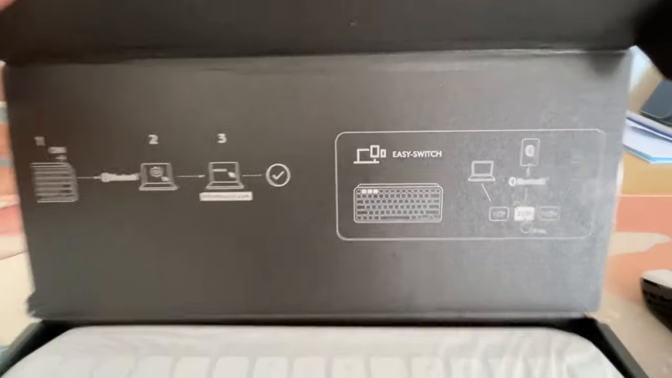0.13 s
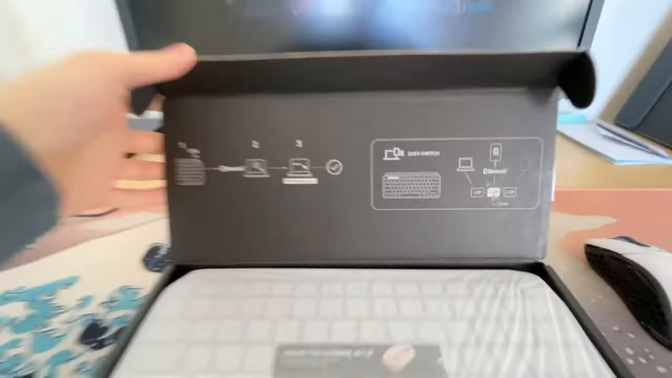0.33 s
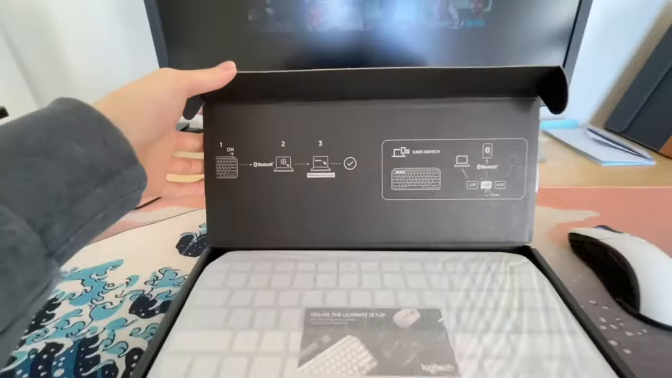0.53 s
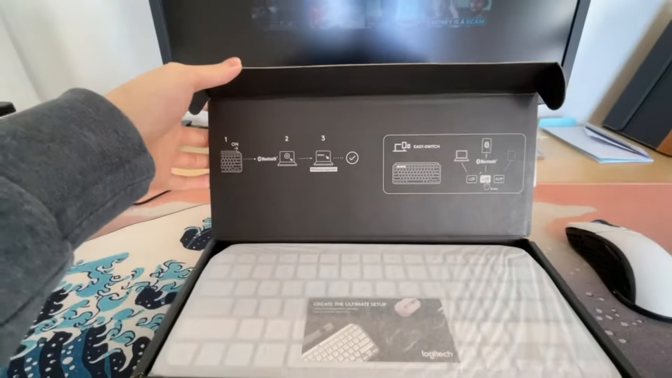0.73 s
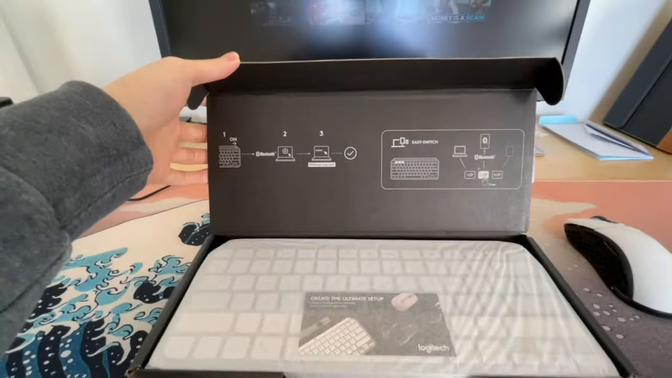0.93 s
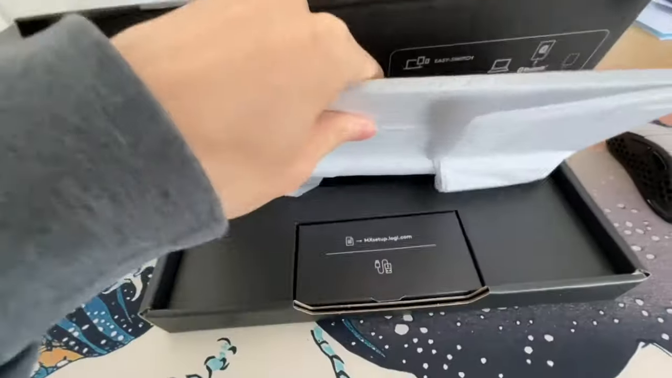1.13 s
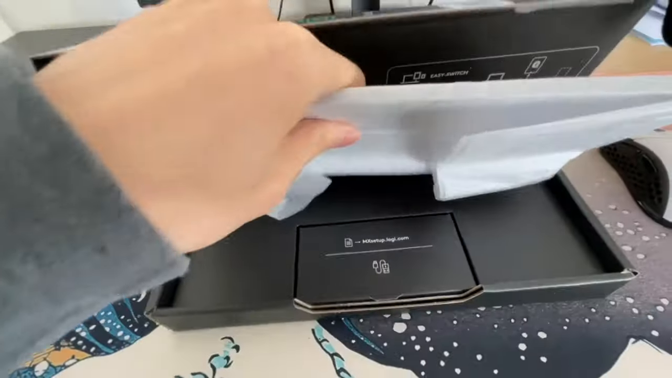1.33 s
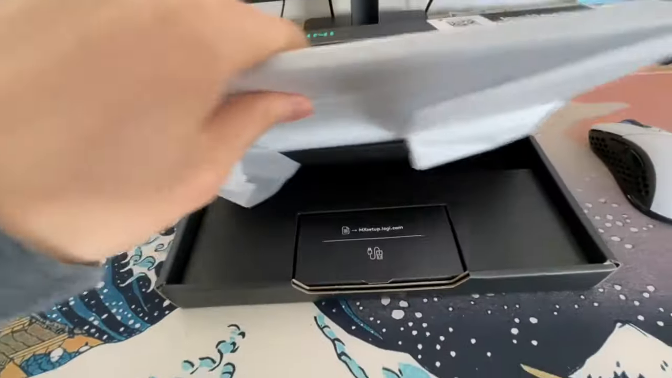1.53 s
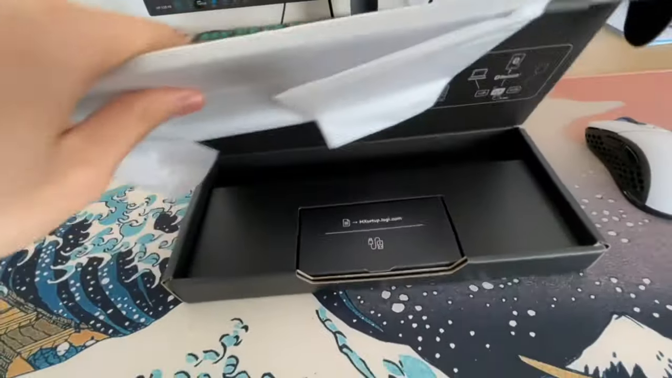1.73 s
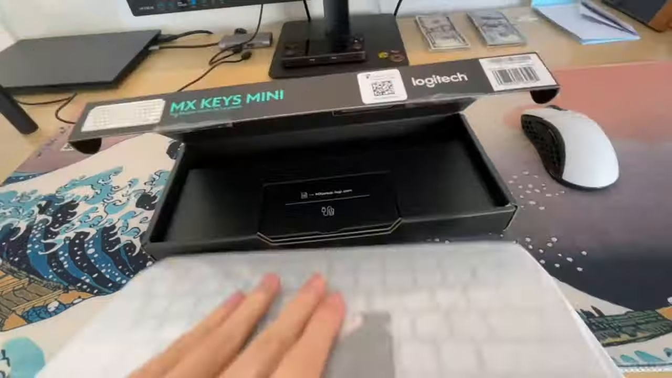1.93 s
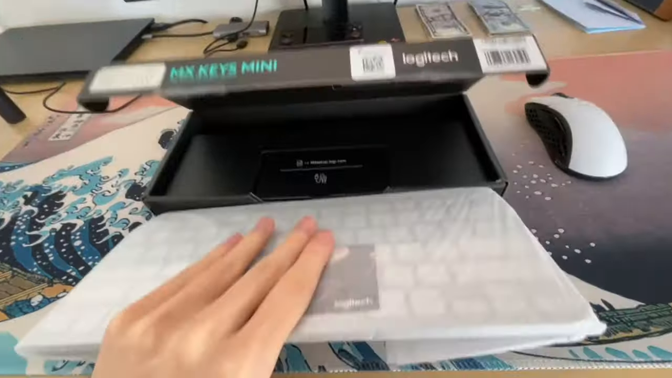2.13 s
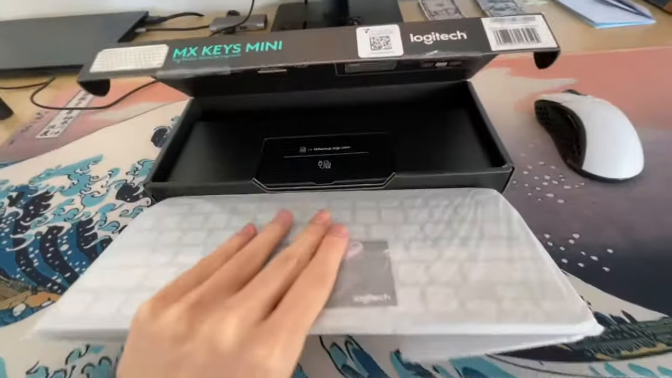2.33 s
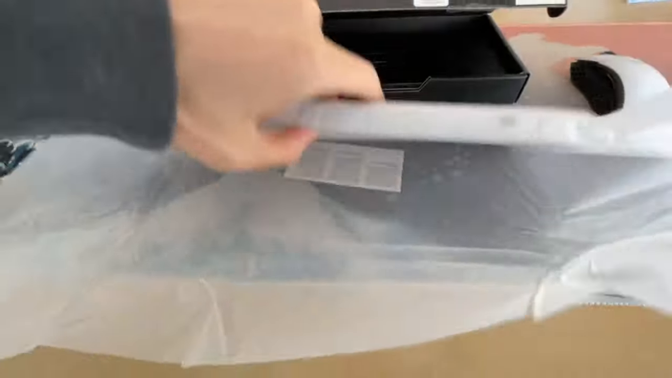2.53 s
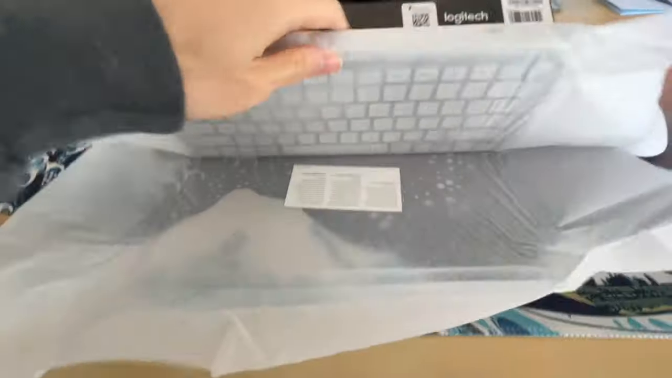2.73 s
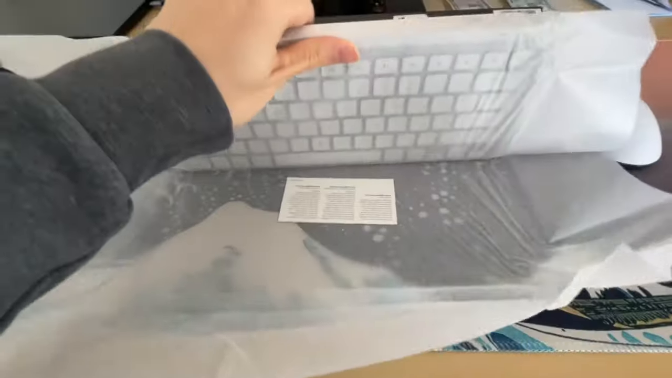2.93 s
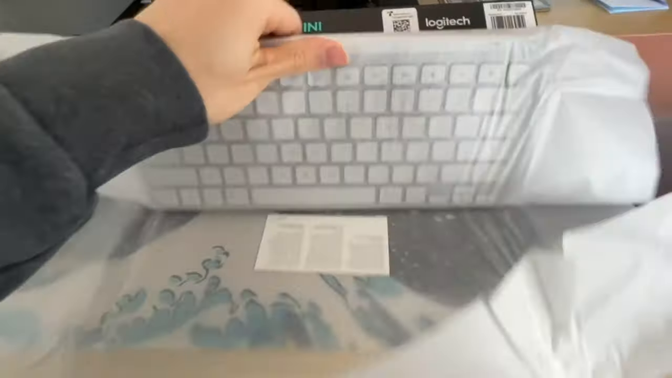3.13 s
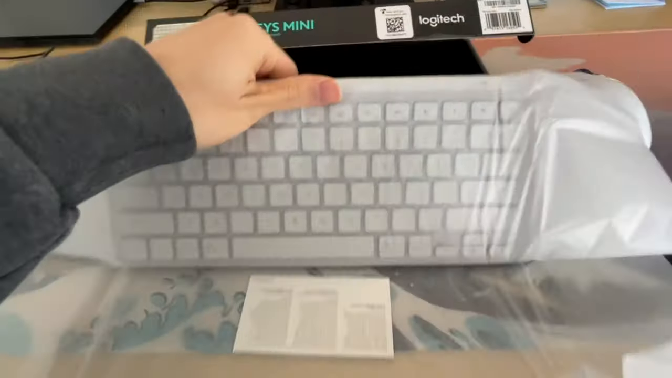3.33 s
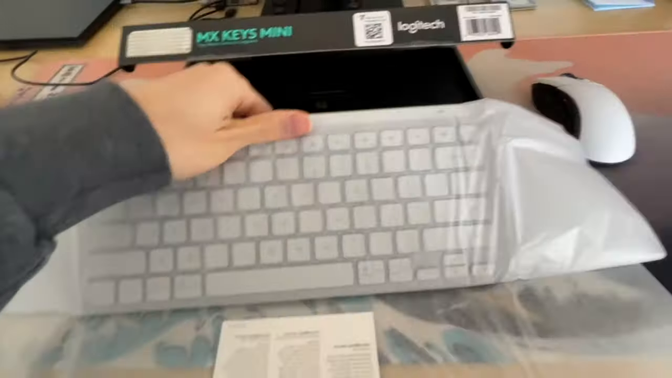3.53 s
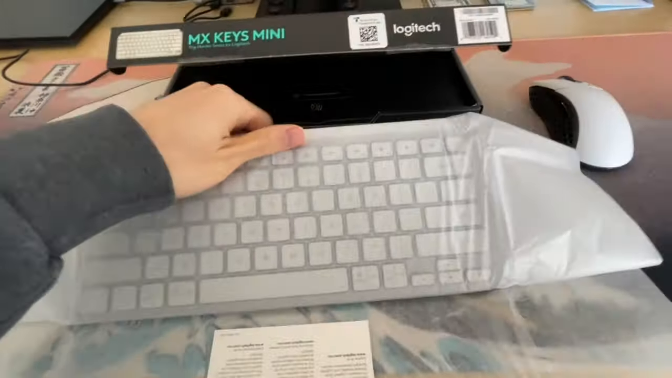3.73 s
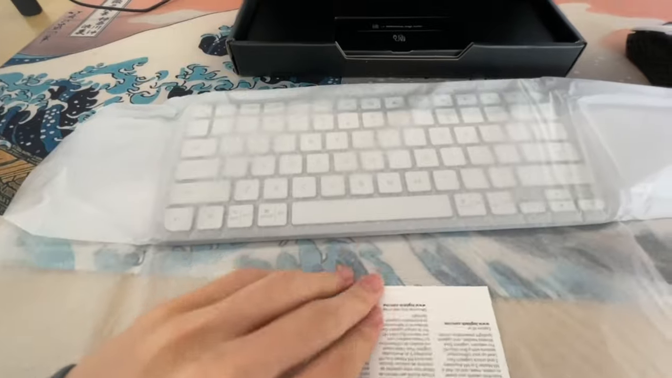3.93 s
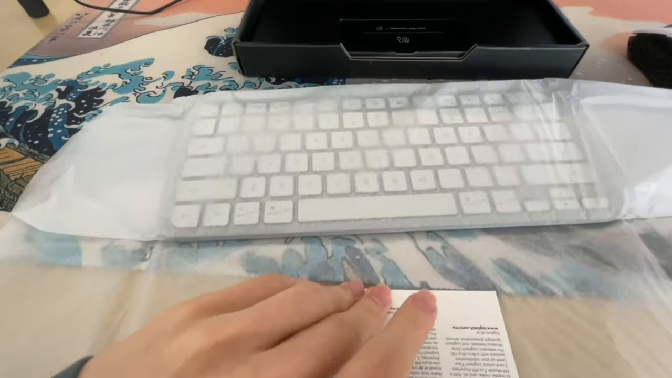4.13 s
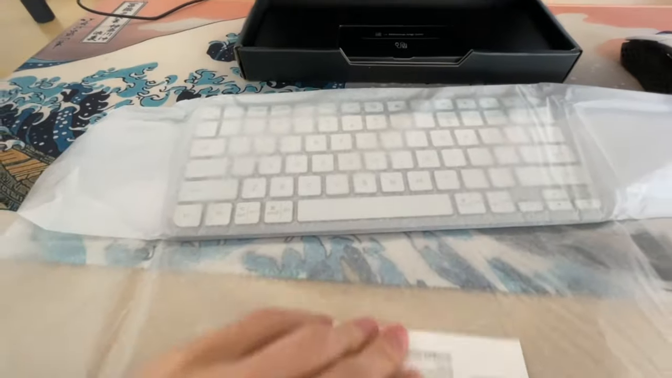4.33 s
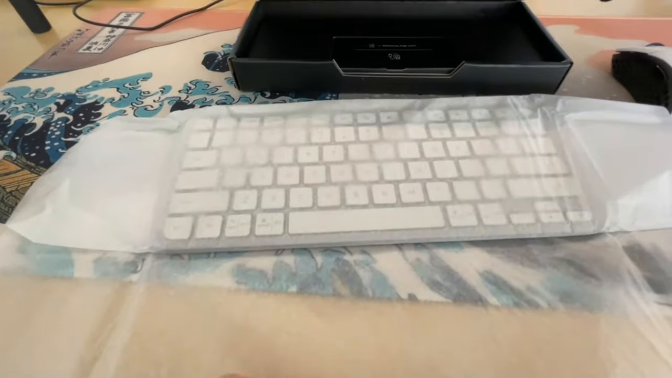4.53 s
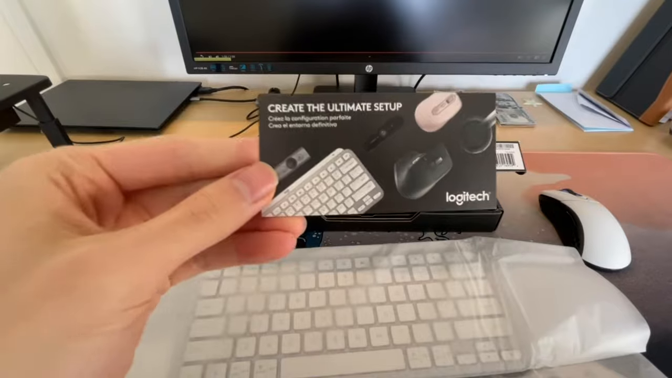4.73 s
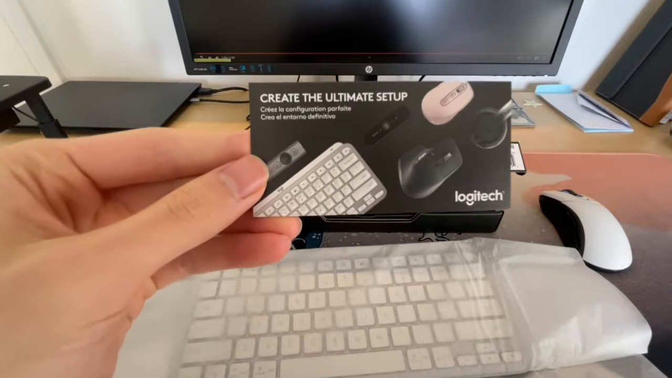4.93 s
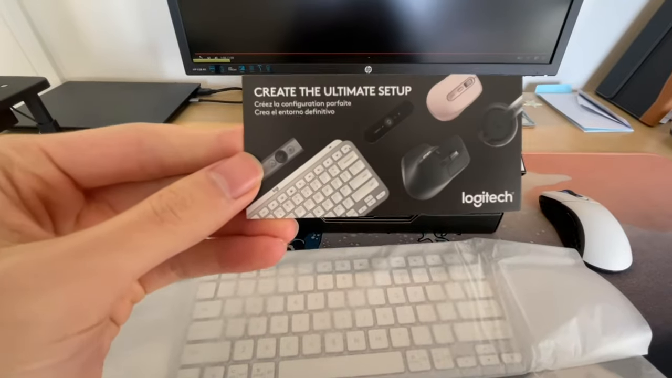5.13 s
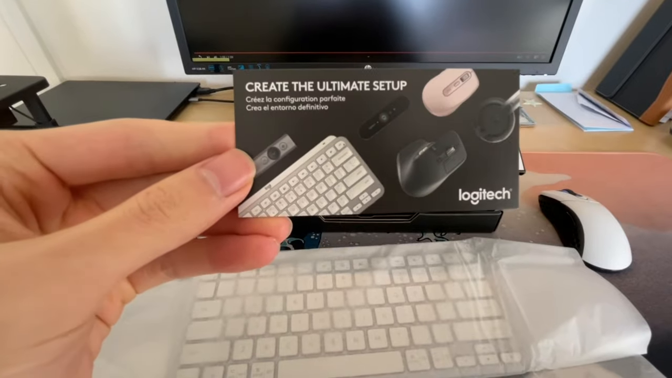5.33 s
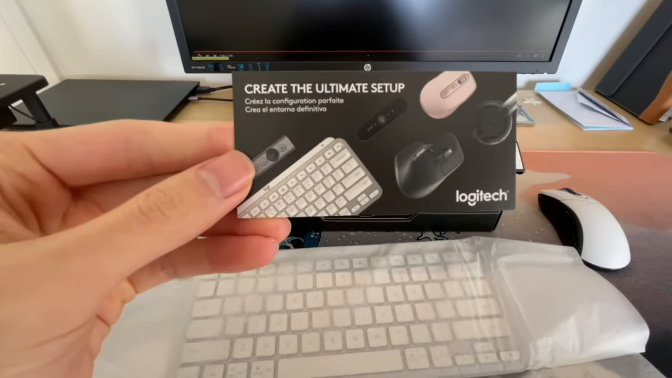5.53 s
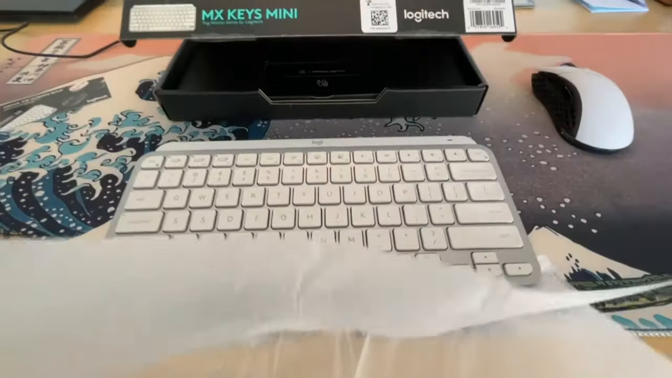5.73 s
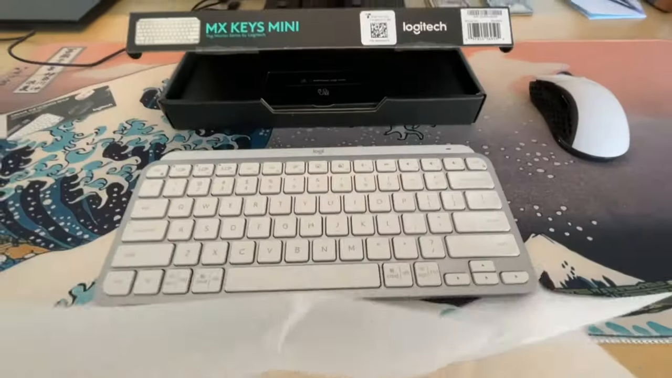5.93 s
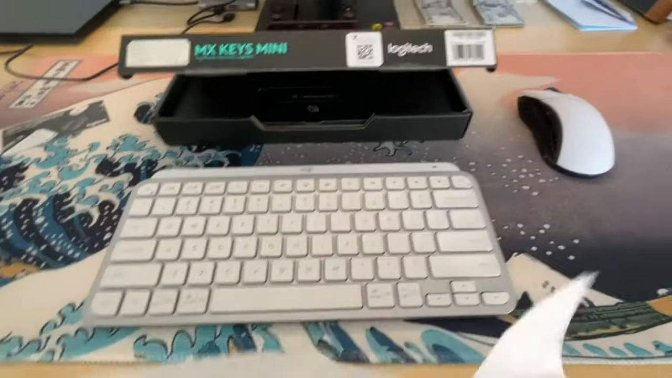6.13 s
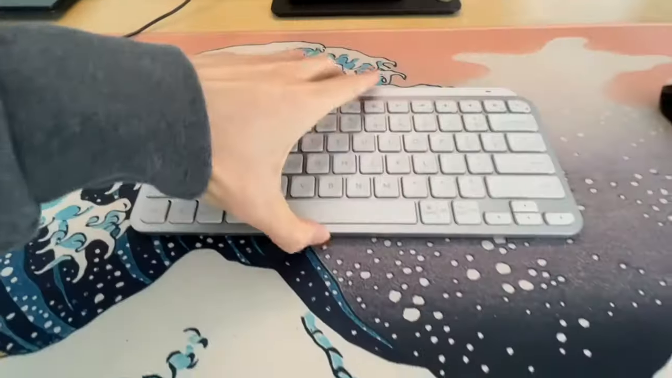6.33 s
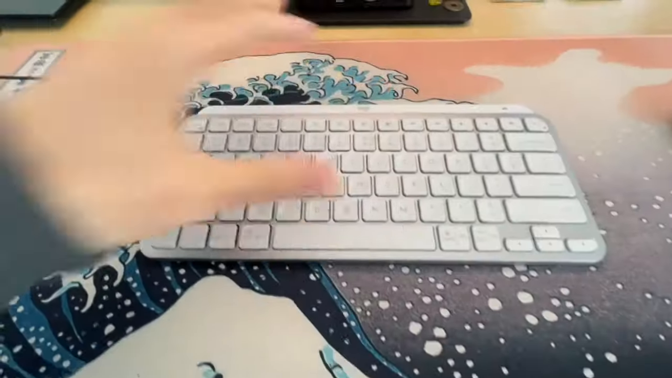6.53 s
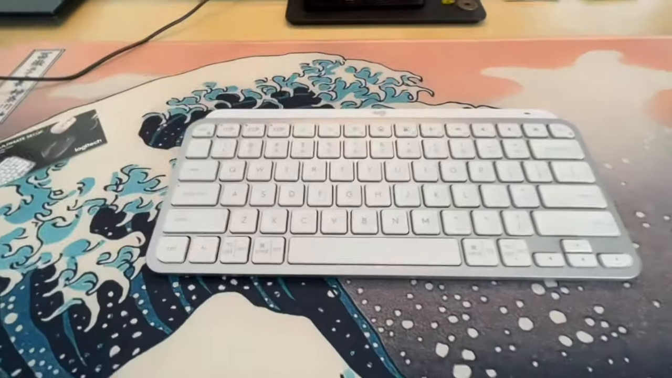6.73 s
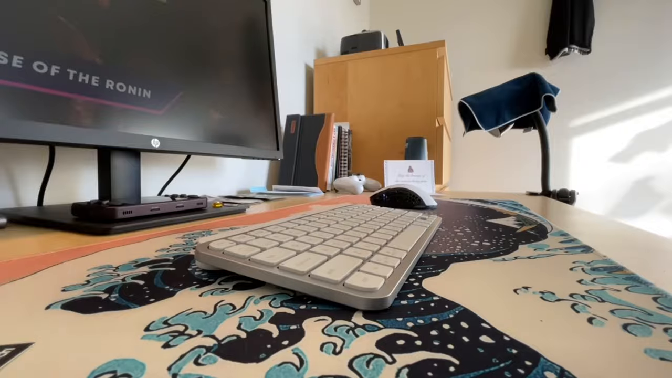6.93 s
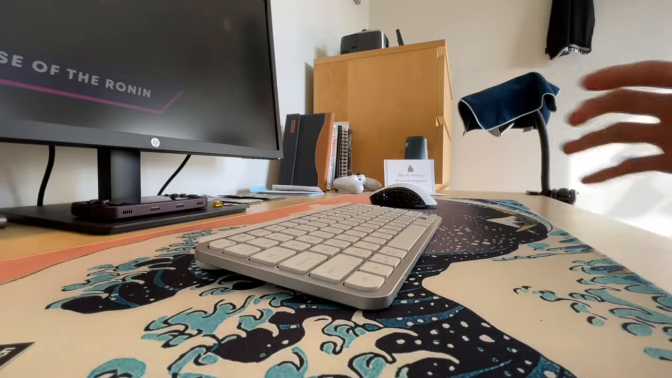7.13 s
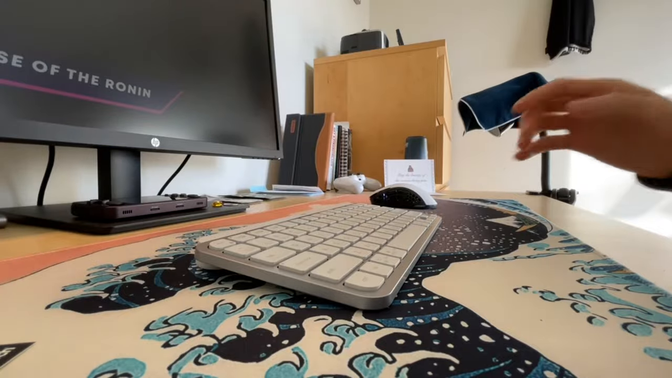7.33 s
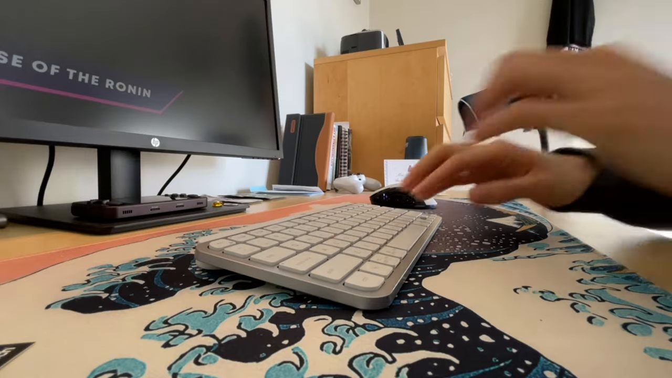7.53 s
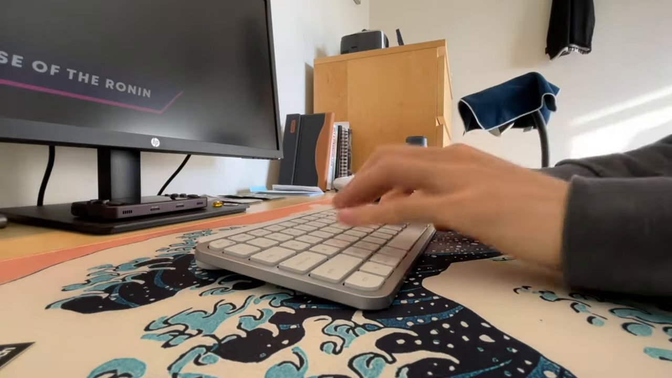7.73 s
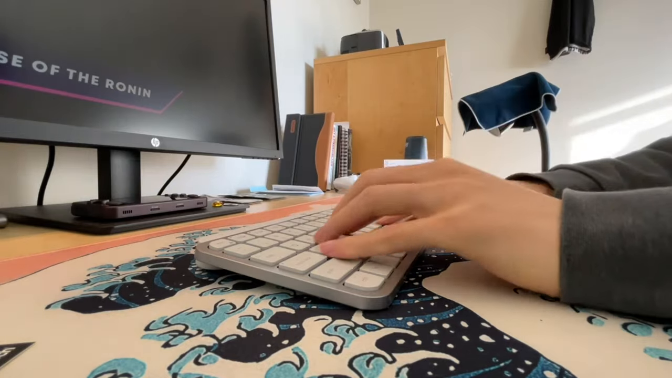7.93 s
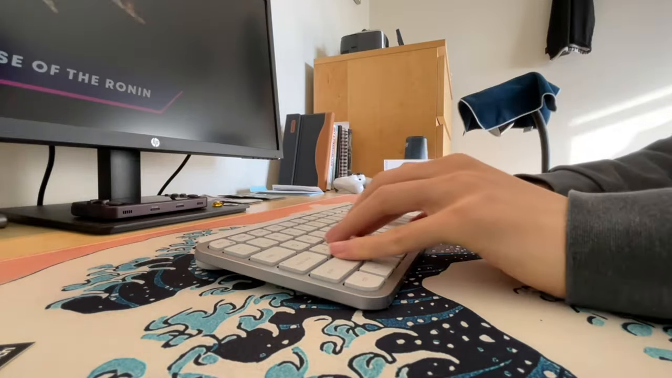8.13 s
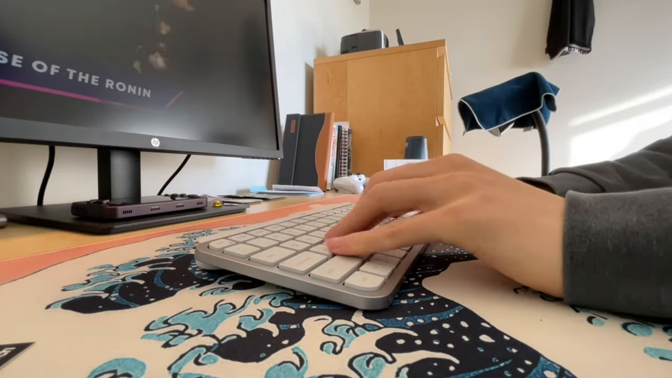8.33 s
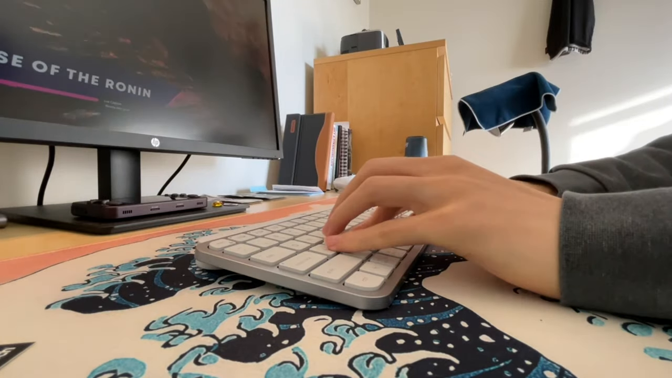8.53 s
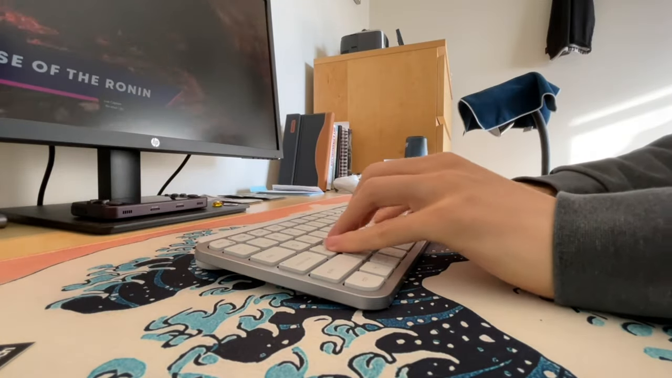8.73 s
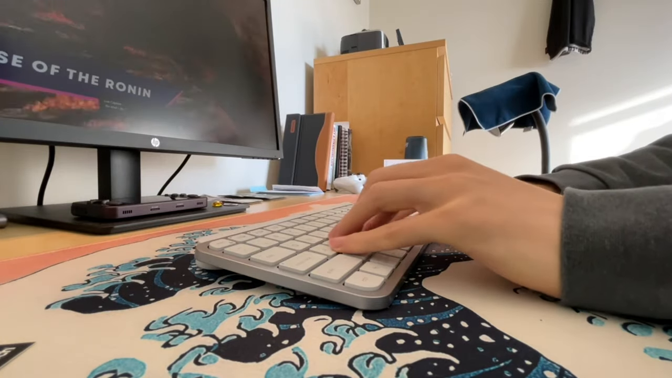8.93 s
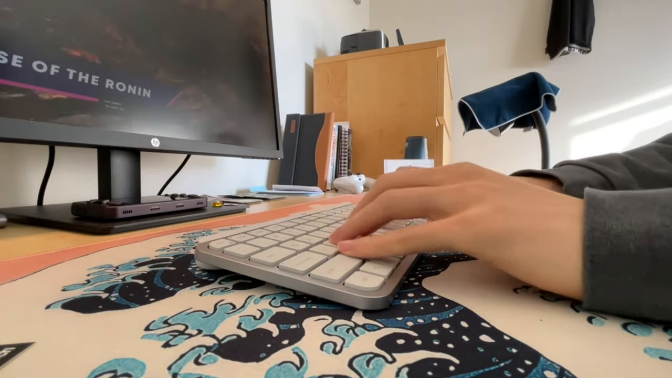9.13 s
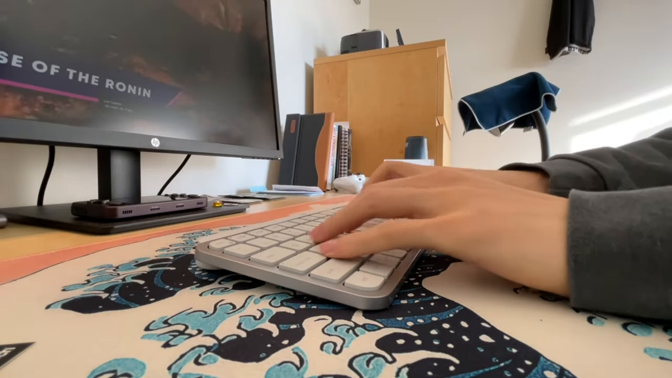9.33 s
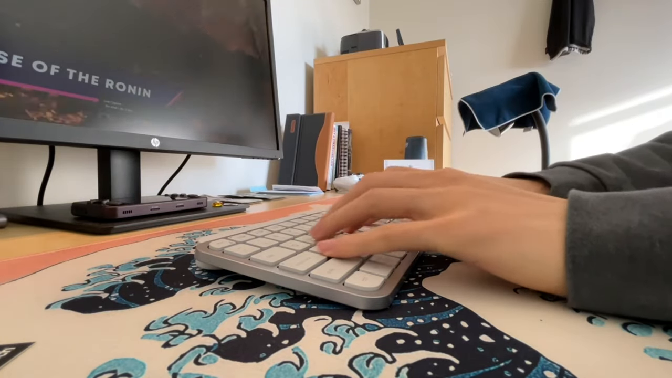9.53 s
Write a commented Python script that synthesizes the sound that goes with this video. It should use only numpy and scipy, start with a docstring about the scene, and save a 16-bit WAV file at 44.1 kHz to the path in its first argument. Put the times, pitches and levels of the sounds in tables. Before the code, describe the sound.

A keyboard is unpacked in a small quiet room: hollow cardboard bumps, loud crackling thin wrapper, hard clacks, then soft quick typing over computer fan hum.

```python
"""At a desk in a small quiet room, hands brush a lid, then a slim keyboard is unpacked from its box.
Its thin paper wrapper hisses, crackles and snaps; its edge rubs and rasps on cardboard (noise through
moving resonances) and bumps make the hollow box boom (decaying modes). The frame clacks on the desk.
Then cuffs sweep the mat, a computer fan comes up (shaped noise and wavering tones), and typing begins:
light key ticks (noise bursts with a small ring) over soft thuds of the desk top (low modes)."""
import sys
import numpy as np
from scipy import signal
from scipy.fft import rfft, irfft, next_fast_len
from scipy.io import wavfile

SR = 44100
rng = np.random.default_rng(int(sys.argv[2]) if len(sys.argv) > 2 else 0)


def transcribe(signal):
    """Save signal, clipped to [-1, 1], as a 16-bit WAV file at the path in sys.argv[1]."""
    frames = np.atleast_2d(signal).T
    limited = np.clip(frames, -1, 1)
    pcm = np.round(limited * 32767).astype(np.int16)
    wavfile.write(sys.argv[1], SR, pcm)


N = 422919
TIME = np.arange(N) / SR

# modes of the desk top under the mat: f/Hz before detuning, relative level/dB, t60/s
DESK_MODES = [(58.1, -3.5, 0.2), (73.7, -6, 0.2), (106, -5.5, 0.17), (120.8, -6, 0.24), (136, -11, 0.12),
              (175, -14, 0.11), (276.6, -26.5, 0.07)]
# spectrum of a paper fold snapping: f/Hz, relative level/dB
SNAP_SPECTRUM = [(400, -10), (1500, -14), (3500, -7), (7000, -1.5), (10000, 4), (12500, -1.5), (15500, -20)]


def from_db(db):
    """Decibels to gain."""
    return 10 ** (np.asarray(db) / 20)


def rms_one(x):
    """Scale to unit rms."""
    return x / np.sqrt(np.mean(x ** 2) + 1e-20)


def in_time(rows):
    """Each column of a curve at every sample."""
    s, *columns = np.transpose(rows)
    return [np.interp(TIME, s, c) for c in columns]


def during(start, end, fade_s):
    """One from start to end, fading in just before and out just after."""
    inside_s = np.minimum(TIME - start, end - TIME)
    return np.clip(1 + inside_s / fade_s, 0, 1)


def pan(side_db):
    """Left and right gains of constant power; positive leans left."""
    gains = from_db(np.array([[.5], [-.5]]) * side_db)
    return gains / np.sqrt(np.mean(gains ** 2, axis=0))


def from_left(x):
    """Sound from the left reaches the right side a moment later."""
    lag_s = 0.00042
    return np.array([x[0], np.interp(TIME - lag_s, TIME, x[1])])


def drift(per_s):
    """Smooth random wandering with unit rms, given new targets per second."""
    knots = rng.standard_normal(int(N / SR * per_s) + 2)
    return rms_one(np.interp(TIME * per_s, np.arange(len(knots)), knots))


def colour(x, spectrum):
    """Shape a sound by a spectrum that falls 24 dB per octave beyond its ends; unit rms."""
    hz, db = np.transpose(spectrum)
    size = next_fast_len(x.shape[-1])
    f = np.arange(size // 2 + 1) * SR / size + 1e-3
    octaves_outside = np.maximum(np.log2(hz[0] / f), 0) + np.maximum(np.log2(f / hz[-1]), 0)
    gain = from_db(np.interp(np.log(f), np.log(hz), db) - 24 * octaves_outside)
    return rms_one(irfft(rfft(x, size) * gain, size)[..., :x.shape[-1]])


def stereo_noise(alike, size=N):
    """White noise, partly shared by both sides."""
    alike = np.clip(alike, 0, 1)
    shared = np.sqrt(alike) * rng.standard_normal(size)
    return shared + np.sqrt(1 - alike) * rng.standard_normal((2, size))


def add(out, s, sound):
    """Mix a short sound in at a time."""
    start = min(round(s * SR), N)
    out[:, start:start + sound.shape[-1]] += sound[..., :N - start]


def crack(spectrum, t60, tail_db, tail_t60, alike, rise_s=1e-5):
    """A contact rings many dense modes: a fast noise burst and a faint tail; peak 1 in the mono mix."""
    t = TIME[:SR // 4]
    decay = from_db(-60 * t / t60) + from_db(tail_db - 60 * t / tail_t60)
    envelope = decay * (1 - np.exp(-t / rise_s))
    burst = colour(stereo_noise(alike, size=len(t)), spectrum) * envelope
    return burst / np.abs(burst.mean(axis=0)).max()


def struck(modes, contact_s, scatter_db, detune, in_step=False):
    """A body rings with new mode strengths at each hit; modes in step knock harder; peak 1."""
    t = TIME[:SR // 3]
    hz, db, t60 = np.transpose(modes)[:, :, None]
    strength, shift = rng.standard_normal((2, len(modes), 1))
    signs = 1 if in_step else (-1) ** np.arange(len(modes))[:, None]
    decay = from_db(db + scatter_db * strength - 60 * t / t60)
    rings = signs * decay * np.sin(2 * np.pi * hz * (1 + detune * shift) * t)
    sound = rings.sum(axis=0) * (1 - np.exp(-t / contact_s))
    return sound / np.abs(sound).max()


def firmer(modes, firm_db):
    """A firm contact lifts the higher modes, a soft one quiets them: dB per octave above the lowest."""
    lowest_hz = modes[0][0]
    return [(hz, level + firm_db * np.log2(hz / lowest_hz), *rest) for hz, level, *rest in modes]


def room(x, wet_db):
    """Diffuse reflections of a small furnished room, different on each side."""
    t, t60 = TIME[:SR // 2], 0.43
    tail = rng.standard_normal((2, len(t))) * from_db(-60 * t / t60) * (t > .004)
    tail /= np.sqrt(np.sum(tail ** 2, axis=1, keepdims=True))
    return x + from_db(wet_db) * signal.fftconvolve(x, tail, axes=1)[:, :N]


def swells(rows):
    """Gain of hand movements that speed up to a rounded peak and slow down; their powers sum."""
    swell_db, curve = 18.5, 1.61  # gained over the rise and lost over the fall
    t, power = TIME[::32], 0
    for s, rise_s, fall_s, db in rows:
        away = np.maximum((s - t) / rise_s, (t - s) / fall_s)
        power = power + from_db(db - swell_db * np.minimum(np.abs(away), 10) ** curve) ** 2
    return np.interp(TIME, t, np.sqrt(power))


def crackle(per_s, spread_db, clump_db):
    """Tiny buckles come in clumps, each with its own size, direction and short quiver."""
    born = rng.random(N) < per_s * from_db(clump_db * drift(60)) / SR
    sizes = born * from_db(spread_db * np.minimum(rng.exponential(1, N), 3))
    clicks = rms_one(sizes * np.tanh(stereo_noise(alike=0.074)))
    quiver_t60 = .003
    pole = from_db(-60 / (quiver_t60 * SR)) ** 2  # squared, as it acts on power
    dying_power = signal.lfilter([1], [1, -pole], sizes ** 2 + 1e-18)
    quiver = rms_one(np.sqrt(dying_power) * rng.standard_normal((2, N)))
    return rms_one(clicks + quiver)


def gliding(slips, hz, width_hz):
    """A resonance whose centre moves, excited by slips: shift to zero, low-pass, shift back."""
    turn = np.exp(2j * np.pi * np.cumsum(hz) / SR)
    lowpass = signal.butter(2, width_hz / 2, fs=SR, output="sos")
    return np.real(turn * signal.sosfilt(lowpass, slips / turn))


def tone(hz, db):
    """A fan tone, slightly wavering in pitch and level."""
    phase = 2 * np.pi * np.cumsum(hz * (1 + 0.0024 * drift(25))) / SR
    return np.sqrt(2) * from_db(db + 1.3 * drift(7.8)) * np.sin(phase)


def background():
    """Quiet room air as shaped noise, and a computer fan of broad air noise, blade tone and faint tones."""
    # spectra of the room air (the computer faintly in it) and of the fan's air: f/Hz, relative level/dB
    room_spectrum = [(25, -14), (50, -0.5), (75, -6.5), (130, -17.5), (200, -16), (340, -18.5),
                     (500, -16.5), (730, -16), (840, -8.5), (1100, -23.5), (1700, -26.5), (2400, -24),
                     (3500, -37.5), (9700, -48.5), (14000, -61)]
    fan_spectrum = [(250, -14), (330, -13), (385, -14), (465, -5.5), (535, -14.5), (620, -3.5), (740, -8.5),
                    (900, -10), (1230, -17), (1750, -25.5), (2100, -21), (2700, -29.5), (5000, -34.5),
                    (6500, -44), (8000, -41.5), (9400, -35.5), (10400, -41), (11500, -50.5), (14000, -58)]
    # level of the fan's air, and of its blade tone: t/s, level/dB
    fan_curve = [(0, -72.5), (6.3, -93), (6.4, -70.5), (6.85, -60.5), (7.0, -60.5), (7.5, -56.5),
                 (8.2, -55), (9.59, -55)]
    hum_curve = [(6.88, -100), (6.95, -70.5), (7.2, -63), (9.59, -60)]
    # faint steady tones of the computer: f/Hz, level/dB
    whines = [(140, -82.5), (339, -83), (473.7, -80.5), (560, -84.5), (705, -75.5), (840, -75)]
    fan_db, = in_time(fan_curve)
    hum_db, = in_time(hum_curve)
    air = from_db(-62.0) * colour(stereo_noise(alike=0.36), room_spectrum)
    fan = from_db(fan_db) * colour(stereo_noise(alike=0.52), fan_spectrum)
    blades = tone(340.3, hum_db)
    hum = blades + sum(tone(hz, db) for hz, db in whines)
    return from_left(air + fan + hum) * pan(4.0)


def brushing(strokes, spectrum):
    """Cloth or skin slides over a surface with a fine grain: hiss with tiny clicks in it."""
    grain = crackle(per_s=1500, spread_db=4.0, clump_db=4.0)
    fibres = stereo_noise(alike=0.037) + from_db(-2.5) * grain
    return colour(fibres, spectrum) * swells(strokes) * pan(0.18)


def sleeves():
    """Hands and cuffs brush the lid and the mat in noisy swells; one sleeve sweeps past."""
    # strokes over lid and mat, and the sweep: t/s of the peak, rise/s, fall/s, level/dB
    stroke_rows = [(.30, 0.032, 0.047, -68), (.54, .2, .2, -79.5), (6.51, 0.29, 0.3, -70),
                   (6.79, 0.1, 0.042, -63.5), (6.86, 0.048, 0.05, -53), (6.915, 0.044, 0.019, -54),
                   (7.16, 0.13, 0.28, -67.5), (7.725, 0.094, .12, -65), (7.95, 0.18, 0.23, -58.5),
                   (8.37, 0.13, 0.055, -67.5), (8.56, 0.11, 0.36, -67.5), (8.75, 0.057, .05, -62),
                   (8.85, 0.025, 0.098, -64.5), (9.02, 0.14, 0.19, -61.5), (9.33, 0.24, 0.1, -64),
                   (9.5, 0.035, 0.11, -58.5)]
    sweep_rows = [(7.077, 0.094, 0.044, -44.5)]
    # their spectra: f/Hz, relative level/dB
    stroke_spectrum = [(1500, -7), (2100, -8), (2900, -2), (5500, -7), (7400, -4.5), (9500, -5),
                       (11000, -8.5), (12500, -15), (15000, -30)]
    sweep_spectrum = [(1500, -5), (2200, -3), (2900, -1), (4300, -3), (7500, 2.5), (9500, -6.5),
                      (11000, -17), (12000, -30)]
    sweep = brushing(sweep_rows, sweep_spectrum) * during(7.012, 7.2, fade_s=0.0059)
    return brushing(stroke_rows, stroke_spectrum) + sweep


def creases():
    """Larger folds let go with a sharp snap: a short bright burst, each with its own brightness."""
    # creases snapping: t/s, level/dB, left over right/dB
    snaps = [(1.0739, -34, -1), (1.2013, -32, -3), (1.2358, -33, -6), (1.2857, -23, -5), (1.5126, -33, -2),
             (1.639, -26.5, -5), (1.6542, -24.5, -5), (1.782, -36, -5), (1.8807, -44, 1), (1.9419, -40, -1),
             (2.238, -29, -5), (2.4425, -28, -7), (2.5845, -25, -9), (2.591, -27, -5), (2.6365, -30, -8),
             (2.6428, -31, -5), (2.6573, -27, 0), (2.7403, -28, -2), (2.7496, -28, -7), (2.7791, -23, -5.5),
             (2.7895, -27, 2), (2.799, -27, -5), (2.8462, -31, -6), (2.8681, -21, -10), (2.943, -27, 0),
             (3.2582, -24.5, -6), (3.2945, -21.5, 0), (3.3009, -27, -1), (3.5532, -25, 2), (3.6009, -27, 1),
             (3.6646, -28, -10), (3.697, -19.5, -4), (3.8959, -30, -1), (3.9319, -24, 1), (3.9392, -29, -1),
             (3.9632, -32, -2), (4.012, -23, -5), (4.017, -23, -3), (4.021, -20.5, -9), (4.0604, -21.5, 1),
             (4.1009, -25.5, -4), (4.1201, -32.5, 0), (4.1269, -26.5, 0), (4.1625, -37, -1),
             (4.1909, -27, 0.5), (4.2612, -28.5, -4), (4.411, -22, -1), (4.5133, -12, -4.5),
             (4.518, -18, -1), (4.5358, -22.5, -1), (4.565, -21.5, 0), (5.2975, -50.5, 2), (5.69, -24, -6),
             (5.7628, -23.5, -3), (5.7802, -26, -6), (5.834, -20, -5), (5.8702, -29, -2), (5.8934, -28, -2),
             (5.9504, -19.5, -6), (6.0226, -24, -1), (6.0539, -25, -2), (6.085, -26.5, -2),
             (6.1077, -29, -2), (6.117, -24.5, -5), (6.1478, -29, -4), (6.1727, -30, -6), (6.1816, -32, -6),
             (6.2403, -17, -4), (6.2609, -19.5, 1), (6.2878, -20, -4)]
    out = np.zeros((2, N))
    for s, db, side_db in snaps:
        spectrum = firmer(SNAP_SPECTRUM, 2.5 * rng.standard_normal())
        snap = crack(spectrum, t60=.006, tail_db=-24.5, tail_t60=0.073, alike=0.2, rise_s=.0005)
        add(out, s, from_db(db) * pan(side_db) * snap)
    return room(out, wet_db=-31.5)


def shifting(x, patchy_db):
    """Different folds sound in turn, so each quarter octave swells and fades by itself."""
    centres = np.geomspace(1000, 16000, num=17)
    size = next_fast_len(N)
    octave = np.log2(np.maximum(np.arange(size // 2 + 1) * SR / size, 1))
    spectrum, out = rfft(x, size), 0
    for share in np.eye(len(centres)):
        weight = np.interp(octave, np.log2(centres), share)
        band = irfft(spectrum * weight, size)[:, :N]
        out = out + band * from_db(patchy_db * drift(25))
    return rms_one(out)


def off_desk(x):
    """The reflection from the desk combs the rustle; its path changes as the sheet moves."""
    typical_lag_s, echo_db = .0012, -1
    echoes = []
    for side in x:
        lag_s = typical_lag_s * np.exp(.25 * drift(7))
        source = np.arange(N) - np.round(lag_s * SR).astype(int)
        echoes.append(side[np.maximum(source, 0)])
    return rms_one(x + from_db(echo_db) * np.array(echoes))


def small_snaps():
    """Little folds flick over at random, each a short burst with its own size and side."""
    per_s, smallest_db = 60, -1  # level before the crinkle's own swell
    out = np.zeros((2, N))
    shapes = [crack(SNAP_SPECTRUM, t60=0.007, tail_db=-28.0, tail_t60=.04, alike=0.18,
                    rise_s=.0005)[:, :SR // 30] for _ in range(8)]
    slot = SR // 200  # at most one snap in each
    for k, (chance, late, size, side, shape) in enumerate(rng.random((N // slot, 5))):
        if chance < per_s * slot / SR:
            gain = from_db(smallest_db + 3.5 * size ** 2) * pan(14 * (side - .5))
            add(out, (k + late) * slot / SR, gain * shapes[int(shape * len(shapes))])
    return out


def wrapper():
    """Thin paper hisses as it slides and crackles as it buckles; the sheet rubs lower; tugs swell both."""
    # steady sliding of the wrapper: start t/s, end t/s, crinkle level/dB
    handling = [(1.071, 1.818, -54), (1.973, 3.792, -43.5), (3.811, 4.66, -52), (5.698, 6.327, -41.5)]
    # tugs: t/s of the peak, rise/s, fall/s, crinkle level/dB, level/dB of the sheet's rubbing
    tugs = [(1.098, 0.05, 0.067, -31, -48), (1.165, 0.03, 0.032, -37, -46.5), (1.36, 0.11, 0.082, -38, -49),
            (1.53, 0.02, 0.045, -40, -44), (1.70, 0.11, 0.087, -45.5, -81),
            (1.78, 0.0082, 0.084, -49.5, -47), (1.99, 0.1, 0.21, -37.5, -40),
            (2.31, 0.1, 0.074, -59, -44.5), (2.354, 0.054, 0.027, -34, -51),
            (2.425, 0.029, 0.084, -40, -52), (2.59, 0.24, 0.34, -41, -50.5),
            (3.045, 0.098, .12, -33.5, -45), (3.25, 0.27, 0.28, -39, -46), (3.565, 0.11, 0.066, -38, -40.5),
            (3.705, 0.03, 0.16, -39, -45), (3.885, 0.078, 0.042, -39.5, -50),
            (3.936, 0.0099, 0.041, -38.5, -45), (4.02, 0.03, 0.042, -38.5, -49.5),
            (4.063, 0.0091, 0.026, -34, -46), (4.10, 0.017, 0.065, -45.5, -46.5),
            (4.21, 0.026, 0.067, -47, -49.5), (4.27, 0.01, .06, -43, -55), (4.31, 0.049, 0.079, -36, -53),
            (4.44, 0.17, 0.14, -31.2, -40.5), (4.517, 0.042, 0.09, -28.5, -39.5),
            (4.595, 0.061, 0.056, -33, -44.5), (5.703, 0.063, 0.055, -32, -49),
            (5.764, 0.06, 0.047, -31, -43.5), (5.84, 0.061, 0.14, -38.5, -68),
            (5.95, 0.058, 0.056, -29.5, -51), (6.035, 0.08, 0.059, -33.5, -51),
            (6.25, 0.074, 0.084, -32, -53), (6.315, 0.046, 0.11, -32.5, -48)]
    # where the hand works on it: t/s, left over right/dB
    hand_side = [(1.08, 1), (1.3, -2.5), (1.75, -1.5), (2.0, 0.5), (2.33, 0.5), (2.44, -2), (3.18, -2.5),
                 (3.43, -1), (3.6, -3), (4.25, -2), (4.45, -0.5), (5.75, 0), (6.3, -2)]
    # spectra of the crinkle on each side, its topmost sizzle and the sheet: f/Hz, relative level/dB
    left_spectrum = [(700, -11.5), (1400, -4), (1700, -6.5), (2600, -1.5), (4400, 0), (5500, -1),
                     (6700, -2), (8500, -4.5), (11500, -4.5), (13200, -8), (14200, -29.5), (16000, -42.5)]
    right_spectrum = [(700, -7.5), (1600, -9), (2600, -4.5), (5500, -1.5), (6700, -2.5), (7700, -1),
                      (8500, 0), (9350, 5.5), (10300, -0.5), (11600, -3), (13200, -10.5), (14200, -30.5),
                      (16000, -44)]
    sizzle_spectrum = [(13000, -31.5), (13900, 3.5), (15200, -0.5), (16000, -3.5)]
    sheet_spectrum = [(30, -9.5), (50, 1), (109, 0), (168, -2), (224, 0.5), (316, -0.5), (615, -2.5),
                      (930, -1), (1160, -5), (1400, -7), (1810, -11), (2600, -21), (3400, -34)]

    spells = [during(start, end, fade_s=0.011) for start, end, _ in handling]
    slide = sum(spell * from_db(db) for spell, (_, _, db) in zip(spells, handling))
    held = sum(spells)
    crinkle_tugs = swells([(s, rise, fall, db) for s, rise, fall, db, _ in tugs])
    sheet_tugs = swells([(s, rise, fall, db) for s, rise, fall, _, db in tugs])
    crinkle_gain = np.hypot(slide, held * crinkle_tugs)
    sheet_gain = np.hypot(slide * from_db(-9.5), held * sheet_tugs)
    side_db, = in_time(hand_side)

    grains = crackle(per_s=1900, spread_db=3.6, clump_db=4.0)
    sliding = stereo_noise(alike=0.024) * from_db(0.62 * drift(90))
    left, right = off_desk(shifting(grains + from_db(-3) * sliding, patchy_db=2.0))
    fine = np.array([colour(left, left_spectrum), colour(right, right_spectrum)])
    # opposite signs make the topmost sizzle very wide
    fine = fine + from_db(-15) * colour(left, sizzle_spectrum) * [[1], [-1]]
    sheet_source = stereo_noise(alike=0.73) + from_db(2.5) * grains
    sheet = from_left(colour(sheet_source, sheet_spectrum)) * from_db(0.81 * drift(50))
    crinkle = (fine + small_snaps()) * crinkle_gain * pan(side_db)
    return crinkle + sheet * sheet_gain * pan(5.2)


def cardboard_drag():
    """With each shove, stick and slip along the box edge rubs broadly and sets bending panels ringing."""
    # shoves of the keyboard along the cardboard: t/s of the peak, rise/s, fall/s, level/dB
    shoves = [(1.12, 0.037, 0.12, -41.5), (1.26, .055, 0.063, -38), (1.34, 0.069, .1, -42),
              (1.47, 0.09, 0.13, -46), (1.705, 0.03, 0.13, -43), (1.745, 0.03, 0.012, -42),
              (2.32, .06, .05, -42)]
    # resonances of the dragged cardboard: middle f/Hz, width/Hz, relative middle level/dB
    panels = [(457, 30, 2), (813, 34, 1), (1394, 133, 0), (2120, 110, -7), (2440, 220, -7), (3550, 150, -7),
              (4200, 300, -10)]
    # the broad rub: f/Hz, relative level/dB
    rub_spectrum = [(150, 0), (450, -3.5), (1400, -3), (2200, -0.5), (2900, -7), (3800, -6), (6000, -8)]
    slips = stereo_noise(alike=0.51) * from_db(4.9 * drift(300))
    rings = 0
    for hz, width_hz, db in panels:
        # each resonance comes and goes as the contact point moves
        level = from_db(db + 5 * drift(18))
        rings = rings + level * gliding(slips, hz * (1 + .016 * drift(14)), width_hz)
    rub = colour(slips, rub_spectrum)
    return rms_one(from_db(1.5) * rms_one(rings) + rub) * swells(shoves) * pan(1.7)


def box():
    """The hollow box booms under a sharp slap of cardboard and shakes the desk beneath it."""
    # bumps of the lid and keyboard, and the keyboard set down on desk and mat: t/s, slap level/dB, boom
    # level/dB, firmness/dB per octave, pitch ratio
    bumps = [(1.151, -45, -36, -5.5, 1.14), (1.214, -53, -39, -5, 1), (1.362, -22, -18, 2.5, 0.87),
             (1.6535, -22, -12.5, 3, 1), (1.666, -47, -18, -7, 1), (1.675, -33, -25, 0, 1.08),
             (1.695, -32, -37, 7, 1), (1.704, -31, -33, 3, 1.05), (1.725, -35, -31.5, 6, 0.97),
             (1.744, -40, -30, 6, 0.88), (1.779, -39, -41, 3, 1), (1.98, -31, -19, -7, 1.05),
             (1.989, -45, -26, -9, 1.6), (2.014, -45, -32, -9, 1), (2.063, -27, -27, -3, 1.7),
             (3.478, -33, -27, 3, 0.796), (3.503, -33, -29, 2, 1.05), (3.546, -36, -34, 2, .9),
             (3.599, -48, -33, -8, .86), (3.697, -46, -38.5, 5, 0.86), (4.399, -41, -34, -2, 0.98),
             (5.69, -35, -37, -18, .9)]
    # modes of the cardboard box: f/Hz at pitch ratio 1 before detuning, relative level/dB, t60/s
    box_modes = [(88, -8, .09), (122, 1, .115), (165, -4, .08), (205, -2.5, .09), (260, -10, .05),
                 (350, -5, .075), (400, -3.5, .06), (457, -1, .085), (515, -7, .05), (575, -13, .05),
                 (700, -15, .07), (900, -18, .06), (1310, -19, .06), (1425, -22, .06)]
    # the slap: f/Hz, relative level/dB
    slap_spectrum = [(200, 2), (470, -1.5), (600, -10.5), (720, 2.5), (900, -6), (1350, -7), (1900, -10.5),
                     (2700, -14.5), (4000, -18), (9000, -33.5)]
    desk_share_db = -16.5
    booms, slaps = np.zeros((2, 2, N))
    for s, slap_db, boom_db, firm_db, ratio in bumps:
        modes = [(hz * ratio, db, t60) for hz, db, t60 in firmer(box_modes, firm_db)]
        boom = struck(modes, contact_s=0.0027, scatter_db=1.5, detune=0.008, in_step=True)
        shake = struck(DESK_MODES, contact_s=0.0022, scatter_db=5.0, detune=0.07)
        slap = crack(slap_spectrum, t60=0.037, tail_db=-23.0, tail_t60=0.15, alike=0.44)
        add(booms, s, from_db(boom_db) * boom)
        add(booms, s, from_db(boom_db + desk_share_db) * shake)
        add(slaps, s, from_db(slap_db) * slap)
    return (room(booms, wet_db=-14.5) + room(slaps, wet_db=-7.0)) * pan(5.1)


def rasp():
    """As the keyboard edge slides up the card its free length shortens, so its resonance climbs."""
    # the rasp up the cardboard: t/s, resonance f/Hz, level/dB
    rasp_curve = [(1.21, 1430, -52), (1.24, 1400, -42), (1.278, 1470, -45), (1.30, 2200, -46),
                  (1.35, 2480, -45), (1.42, 2430, -53), (1.50, 2460, -56), (1.54, 2960, -44),
                  (1.58, 3060, -59)]
    hz, level_db = in_time(rasp_curve)
    slips = crackle(per_s=650, spread_db=1.5, clump_db=2.0)
    ringing = rms_one(gliding(slips, hz, width_hz=480))
    window = during(rasp_curve[0][0], rasp_curve[-1][0], fade_s=0.014)
    return ringing * from_db(level_db) * pan(1.7) * window


def frame():
    """The stiff keyboard frame clacks short and hard as its edge meets the desk and bounces."""
    # clacks and bounces: t/s, level/dB
    clacks = [(2.0515, -14), (2.059, -22.5), (2.1048, -27), (3.479, -32.5), (3.504, -30), (3.519, -35)]
    # modes of the frame: f/Hz before detuning, relative level/dB, t60/s
    frame_modes = [(240, -9.5, .07), (505, -2, 0.064), (726, 0.5, 0.051), (854, -7, 0.023),
                   (1030, -2, .025), (1250, -5.5, 0.032), (1547, -3.5, .03), (2020, 0.5, 0.015),
                   (2250, 0, .012), (2720, 0, .01)]
    out = np.zeros((2, N))
    for s, db in clacks:
        clack = struck(frame_modes, contact_s=0.00027, scatter_db=1.7, detune=0.0089)
        add(out, s, from_db(db) * clack)
    return room(out, wet_db=-8.5) * pan(3.0)


def desk():
    """Every press goes through the soft mat into the desk top; firmer ones reach its higher modes."""
    # fingers and keyboard pressing on the desk: t/s, level/dB, firmness/dB per octave
    thuds = [(5.69, -40, -1), (6.407, -51.5, -2), (6.807, -41.5, -2), (6.878, -45.5, -1),
             (7.711, -54.5, -1), (7.912, -44.5, 3), (8.203, -34, 4), (8.315, -38, 7), (8.393, -37, -3),
             (8.523, -37.5, -2), (8.585, -35, -8.5), (8.636, -35, -3), (8.728, -29.5, -4.5),
             (8.777, -32, 8), (8.85, -34, -10), (8.889, -35.5, -0.5), (8.972, -36.5, -4), (9.022, -41, -9),
             (9.172, -35.5, 6.5), (9.268, -36.5, -9), (9.299, -31, 6), (9.377, -33.5, 10.5),
             (9.409, -37, -8), (9.458, -33.5, -5), (9.493, -28, 6), (9.552, -45, 2)]
    release_s, release_db = 0.0409, -10  # typical delay and relative level of coming back up
    out = np.zeros((2, N))
    for s, db, firm_db in thuds:
        modes = firmer(DESK_MODES, firm_db)
        press = struck(modes, contact_s=0.0014, scatter_db=4.5, detune=0.086)
        release = struck(DESK_MODES, contact_s=.004, scatter_db=2.5, detune=0.097)
        add(out, s, from_db(db) * press)
        add(out, s + release_s * rng.uniform(0.606, 1.4), from_db(db + release_db) * release)
    return from_left(room(out, wet_db=-17)) * pan(13.0)


def keys():
    """Plastic key caps tick and ring as they are touched and let go, each a little differently."""
    # key caps ticking: t/s, level/dB
    ticks = [(7.7195, -54), (7.8991, -42), (7.917, -50), (8.2002, -58), (8.3403, -49), (8.348, -44.5),
             (8.3904, -57), (8.4405, -50.5), (8.525, -47.5), (8.5678, -48.5), (8.6158, -51), (8.7031, -37),
             (8.7265, -48), (8.7404, -36.5), (8.7784, -44), (8.8269, -48.5), (8.8385, -44.5), (8.9798, -52),
             (9.158, -43.5), (9.2185, -53), (9.2505, -49), (9.2777, -41.5), (9.2934, -39), (9.3111, -51),
             (9.3265, -50), (9.3446, -44), (9.3718, -38), (9.4528, -51), (9.4813, -41), (9.4857, -39.5),
             (9.5011, -41), (9.556, -41.5), (9.587, -40.5)]
    # the tick: f/Hz, relative level/dB
    tick_spectrum = [(700, -7), (2000, -6.5), (3300, -5.5), (4600, -1), (6500, 5), (8200, 4), (9600, -5.5),
                     (11500, -3.5), (13000, -9), (16000, -26)]
    # modes of a key cap: f/Hz before detuning, relative level/dB, t60/s
    cap_modes = [(5720, -10, .02), (7320, -1, 0.027), (8190, 0, 0.045)]
    cap_db = -11.5  # the ring beside the tick
    out = np.zeros((2, N))
    for s, db in ticks:
        spectrum = firmer(tick_spectrum, 1.3 * rng.standard_normal())
        tick = crack(spectrum, t60=0.011, tail_db=-22.5, tail_t60=0.27, alike=0.082, rise_s=0.00056)
        ring = struck(cap_modes, contact_s=0.0005, scatter_db=2, detune=0.042)
        add(out, s, from_db(db) * tick)
        add(out, s, from_db(db + cap_db) * ring)
    return room(out, wet_db=-9.5) * pan(2.0)


def scene():
    """Unpacking, then typing."""
    unpacking = creases() + wrapper() + cardboard_drag() + box() + rasp() + frame()
    typing = desk() + keys()
    return background() + sleeves() + unpacking + typing


def record(dry):
    """The deepest bass rolls off and the top of the treble is cut steeply."""
    bass_cut = signal.butter(3, 36, "high", fs=SR, output="sos")
    treble_cut = signal.ellip(10, .1, 80, 16000, fs=SR, output="sos")
    return signal.sosfilt(treble_cut, signal.sosfilt(bass_cut, dry))


dry = scene()
out = record(dry)
transcribe(out)
```